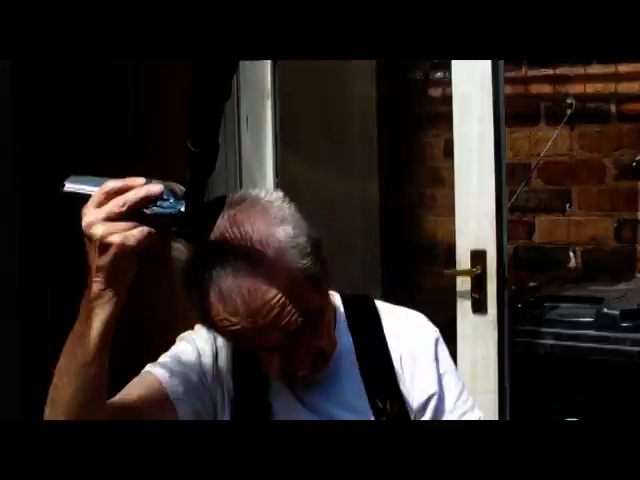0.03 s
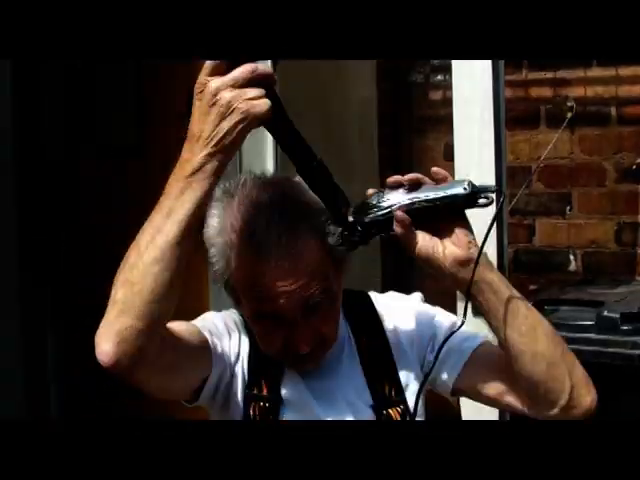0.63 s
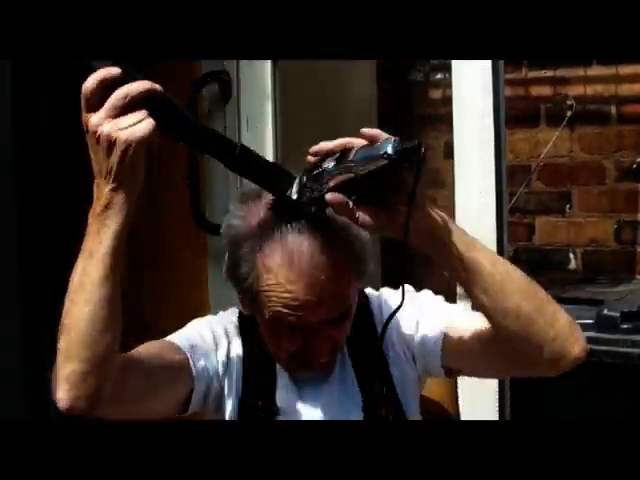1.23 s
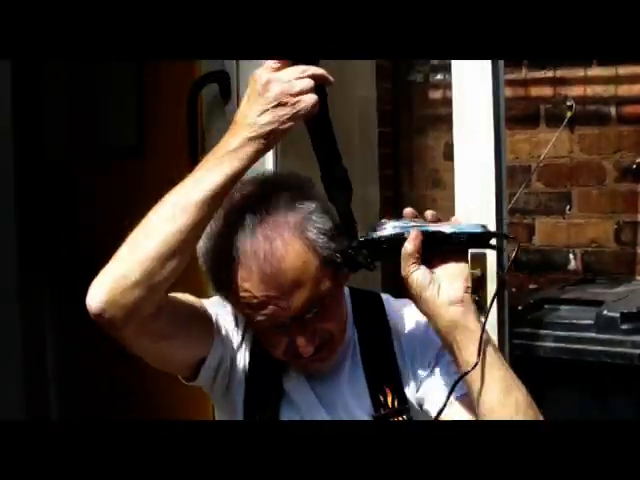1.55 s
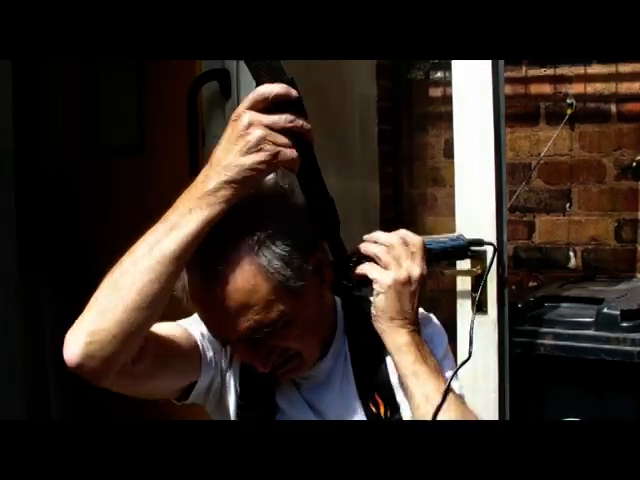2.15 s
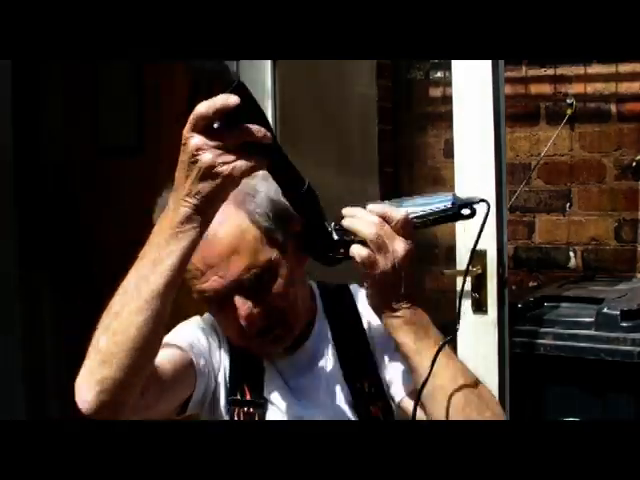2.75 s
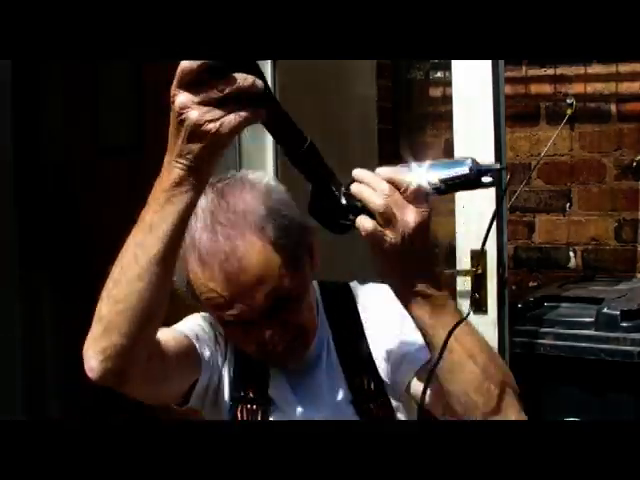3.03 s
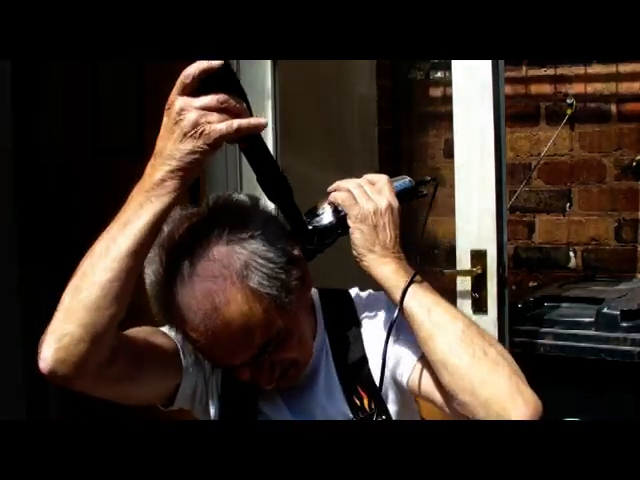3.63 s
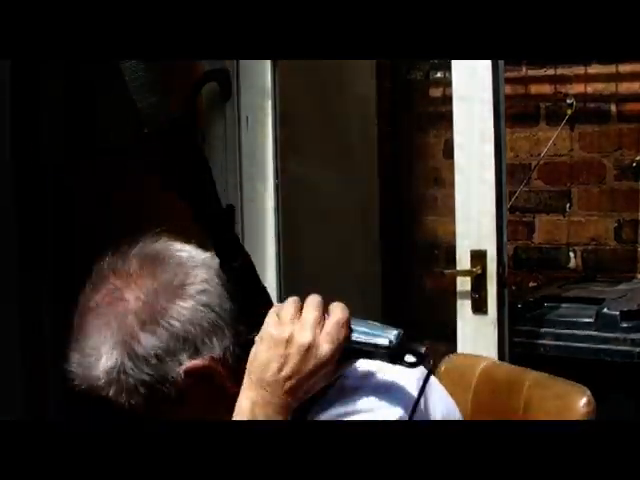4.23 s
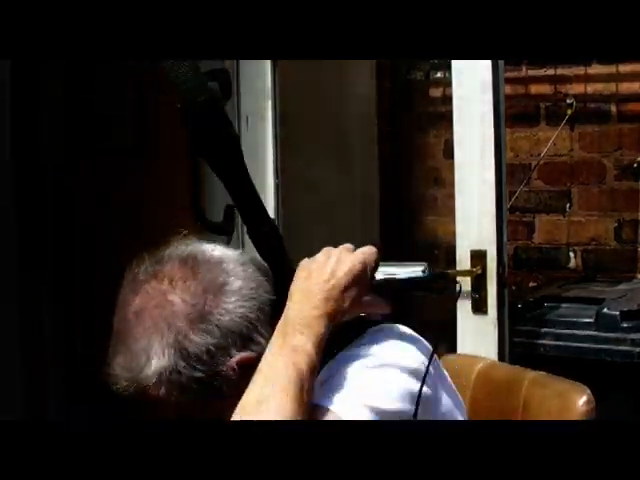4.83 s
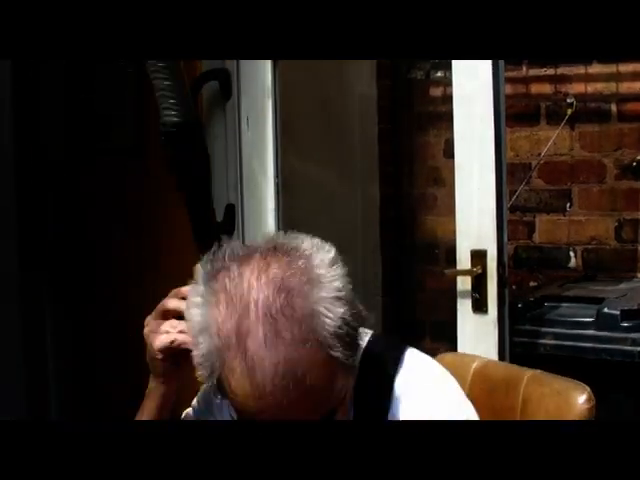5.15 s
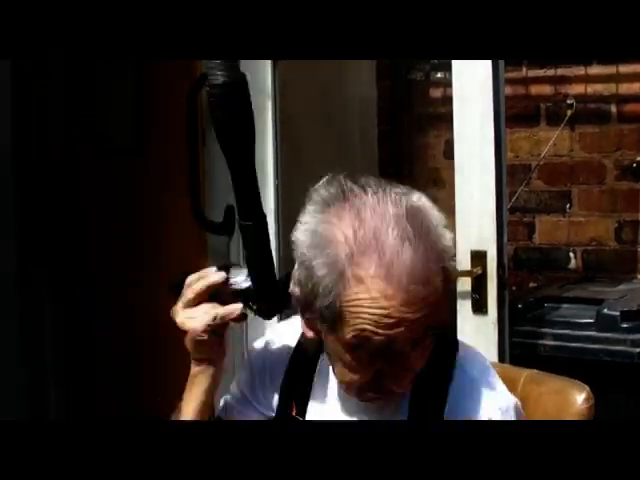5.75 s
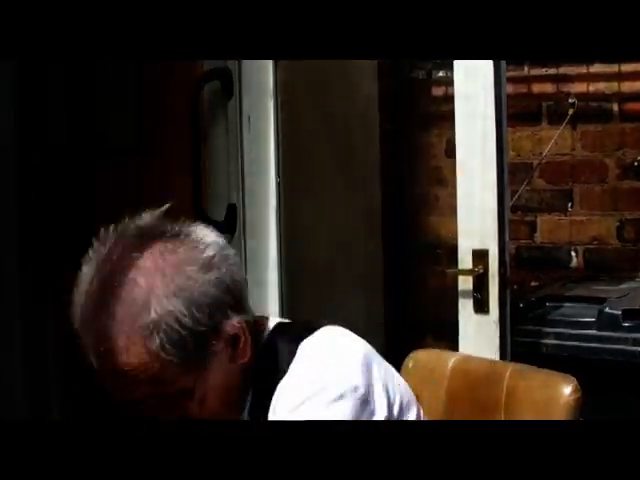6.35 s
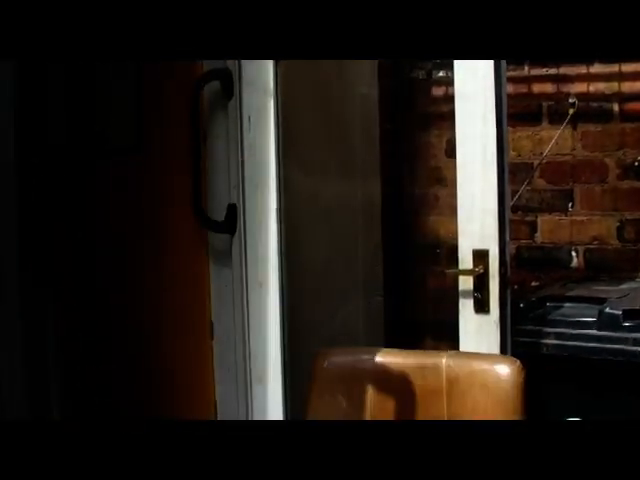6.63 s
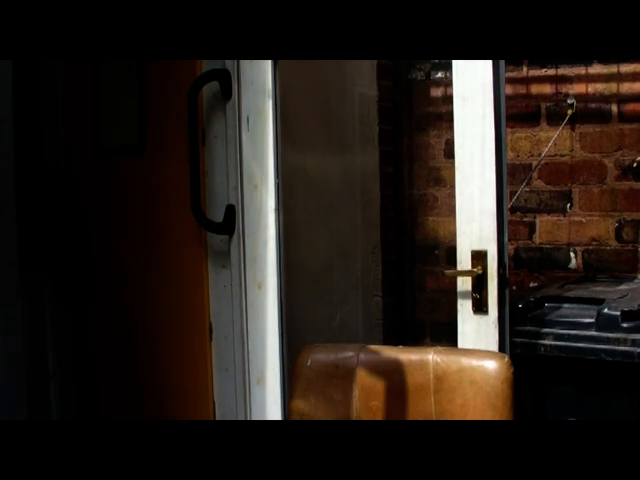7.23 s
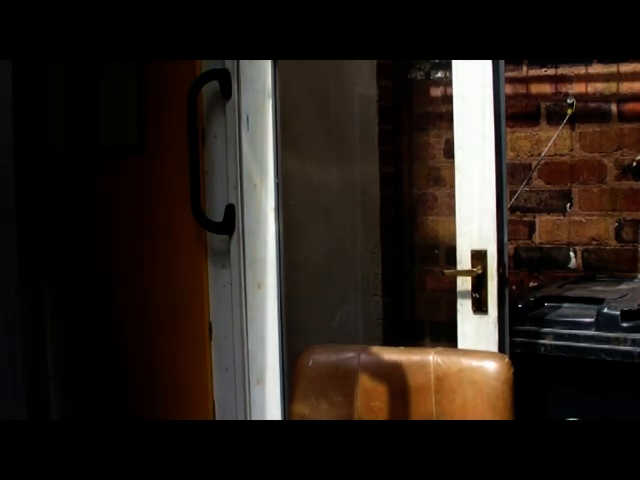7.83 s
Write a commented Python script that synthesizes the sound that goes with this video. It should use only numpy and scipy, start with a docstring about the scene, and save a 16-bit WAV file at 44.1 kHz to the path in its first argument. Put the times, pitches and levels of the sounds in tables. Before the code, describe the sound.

Vacuum suction hisses and whistles shrilly through hair clippers before snapping to a strong steady drone and a lower roar.

```python
"""A piercing, stuttering whistle over a hiss of air: a vacuum hose held to hair clippers in a yard.
The air blows an edge tone, hisses through the comb and rings in the nozzle, shifting in colour as the
nozzle moves over the scalp. Behind it lie a broad rush, a faint motor and a few soft bumps.
Then all but the bumps gives way abruptly to a strong drone, a lower roar in the hose and thin exhaust."""
import sys
import numpy as np
from scipy import signal
from scipy.io import wavfile
from scipy.ndimage import uniform_filter1d

SR = 44100
rng = np.random.default_rng(int(sys.argv[2]) if len(sys.argv) > 2 else 0)


def inscribe(sig):
    """Save sig as 16-bit PCM at rate SR to the path in sys.argv[1].

    A 1-D sig is mono; a 2-D sig holds one channel per row.
    Samples are clipped to [-1, 1] before scaling.
    """
    pcm = np.round(np.clip(np.atleast_2d(sig).T, -1, 1) * 32767)
    wavfile.write(sys.argv[1], SR, pcm.astype(np.int16))


N = 352800
TIME = np.arange(N) / SR
FRAME = 2048   # samples per frame of the noise filters
BIN_HZ = np.maximum(np.arange(FRAME // 2 + 1) * SR / FRAME, 1)[:, None]
FRAME_S = np.arange(N // (FRAME // 2) + 2) * (FRAME // 2) / SR


# pitch and level envelope of the whistle: (time [s], pitch [Hz], relative level [dB])
WHISTLE_ENVELOPE = [(0.0, 6057, -25), (0.43, 6055, -23), (3.16, 6065, -22.5), (3.7, 6069, -22),
                    (4.17, 6052, -21.5), (5.1, 6059, -20.5), (5.25, 6059, -20.5), (6.45, 6067, -22.5)]

def whistle(start_s=.0326, period_s=.10437, break_s=.0025, edge_s=.0003):
    """A pure edge tone that stutters: about ten times a second it slips half a cycle, twice in a row."""
    hz, level_db = in_time(WHISTLE_ENVELOPE, TIME)
    beat = (TIME - start_s) / period_s
    nearest = np.round(beat).astype(int)
    since_s = (beat - nearest) * period_s
    length, first, second = rng.standard_normal((nearest.max() + 1, 3))[nearest].T
    half_s = break_s / 2 * np.exp(.2 * length)
    # a slip forward chirps above the tone, a slip back below it
    slip = np.sign(first) * (1 + np.tanh((since_s + half_s) / edge_s)) / 2
    slip += np.sign(first + second) * (1 + np.tanh((since_s - half_s) / edge_s)) / 2
    level = from_db(level_db + 1.2 + .29 * drift(span_s=.031))
    return level * tone(np.cumsum(hz) / SR + slip / 2, lead=.15)


# each comb stroke opens a hissing gap: (start [s], length [s], level [dB], band centre [Hz])
COMB_STROKES = [(0.0, 0.2, -27, 12300), (0.38, 0.24, -26, 13200), (0.54, 0.32, -33.5, 10600),
                (0.91, 0.14, -25.5, 11600), (1.07, 0.22, -27.5, 10100), (1.38, 0.46, -27.3, 12000),
                (1.92, 0.65, -29, 13200), (2.5, 0.27, -26.5, 10700), (2.79, 0.25, -27, 10800),
                (3.1, 0.05, -27, 10900), (3.35, 0.35, -26.4, 16000), (3.69, 0.25, -29, 11000),
                (4.19, 0.098, -27, 8500), (4.36, 0.06, -25, 14900), (4.532, 0.08, -27.4, 8800),
                (4.69, 0.067, -26, 10900), (4.99, 0.07, -31, 10900), (5.25, 0.087, -29, 11200),
                (5.682, 0.47, -26.5, 13500), (6.16, 0.35, -33, 11200)]

def stroke_power(half_width_hz=2060):
    """Power of the flat-topped hiss bands that the comb strokes open."""
    power = 0
    for s, length_s, db, hz in COMB_STROKES:
        band = unit_power(1 / (1 + ((BIN_HZ - hz) / half_width_hz) ** 6))
        power += (band * from_db(db)) ** 2 * gate(s, length_s, edge_s=.014)
    return power


# EQ curves of the comb's dull, middle and bright hiss: (frequency [Hz], gain [dB])
DULL_EQ = [(4200, 12), (4900, -15), (5500, 9.5), (6400, -2), (7000, 11), (8300, 11), (9300, 6)]
MID_EQ = [(7900, -22), (8900, 2), (10500, 3), (11800, 4.5), (13000, -14)]
BRIGHT_EQ = [(11300, -11), (12400, 5.5), (14000, 4), (15600, 7)]
# level envelope of the dull hiss: (time [s], relative level [dB])
DULL_ENVELOPE = [(0.0, -34), (2.53, -35.5), (3.25, -33), (3.5, -34.5), (4.11, -34), (4.2, -29), (4.49, -33),
                 (4.58, -31), (4.71, -39), (4.81, -29), (4.89, -32), (6.45, -34)]

def comb_hiss(nozzle_rest_hz=3910):
    """Hiss at the comb; hair and scalp keep changing the gaps, so peaks and hollows wander through it."""
    # the dull band follows the nozzle's ring in level and pitch
    strength_db, centre_hz = nozzle_state()
    dull_db = in_time(DULL_ENVELOPE, FRAME_S)[0] + 1.5 + .52 * strength_db
    dull = eq_curve(DULL_EQ, stretch=centre_hz / nozzle_rest_hz) * from_db(dull_db)
    mid = eq_curve(MID_EQ) * from_db(-29.7)
    bright = eq_curve(BRIGHT_EQ) * from_db(-28.5)
    power = dull ** 2 + mid ** 2 + bright ** 2 + stroke_power()
    gaps = flutter(depth_db=.8, width_hz=3500, life_s=.09)
    gaps *= flutter(depth_db=1.3, width_hz=450, life_s=.25)
    gaps *= flutter(depth_db=2.8, width_hz=110, life_s=.07)
    return air(np.sqrt(power) * gaps, side_db=-16) * from_db([[-.2], [.2]])


# the nozzle moves over the scalp: (time [s], relative ring strength [dB], ring centre [Hz])
NOZZLE_MOVES = [(0.0, 0, 4000), (0.24, -5.5, 3780), (0.45, -4, 3980), (0.91, 0, 3990), (1.21, -4, 4050),
                (2.0, -3.5, 3940), (2.46, -3, 4040), (2.54, -1.5, 4020), (2.99, -0.5, 3970),
                (3.55, -5, 4000), (3.72, 0, 4150), (3.8, -2.5, 3710), (4.4, -2.5, 3900), (4.48, 1, 3950),
                (5.39, -0.8, 3916), (5.5, -3, 4040), (6.48, -3.5, 3700)]
# its mouth catches the air and the ring flares: (start [s], length [s], added strength [dB])
NOZZLE_FLARES = [(0.274, 0.091, 5), (1.226, 0.074, 4.5), (4.105, 0.04, 5.5), (4.527, 0.04, 3.5),
                 (4.703, 0.11, 2.5), (5.275, 0.13, 2.5), (5.957, 0.035, 2.5)]

def nozzle_state():
    """Control curves of the moving nozzle: ring strength (dB), flares included, and centre (Hz)."""
    strength_db, centre_hz = in_time(NOZZLE_MOVES, FRAME_S)
    flare_db = sum(db * gate(s, length_s, edge_s=.013) for s, length_s, db in NOZZLE_FLARES)
    return strength_db + flare_db, centre_hz


# air modes of the nozzle: (multiple of the ring centre, nominal width [Hz], gain [dB])
RING_MODES = [(0.914, 222, -6.5), (.985, 256, -1.5), (1.055, 263, -4), (1.37, 380, -5.5), (1.53, 387, -5.5)]

def nozzle_ring():
    """The flow excites the air modes of the nozzle, which shift together as its mouth is covered."""
    strength_db, centre_hz = nozzle_state()
    power = 0
    for multiple, width_hz, db in RING_MODES:
        detune = 1.06 * (BIN_HZ - multiple * centre_hz) / width_hz
        power += (from_db(db) / (1 + detune ** 2)) ** 2
    ring = unit_power(np.sqrt(power)) * from_db(-26 + 1.15 * strength_db)
    return air(ring * flutter(depth_db=2, width_hz=150, life_s=.07), side_db=-33)


# brief wobbles of the drone: (time [s], length [s], phase gained [cycles], level dip [0-1])
DRONE_WAVERS = [(6.994, 0.024, 1, 0.25), (7.352, .036, 0.82, 0), (7.517, .006, 0.61, 0.2)]

def drone(pitch_hz=632, level_db=-20):
    """A strong, pure tone that wavers a few times."""
    cycles, level = pitch_hz * TIME, from_db(level_db)
    for s, length_s, gained, dip in DRONE_WAVERS:
        cycles += gained * ramp(TIME - s, length_s)
        level *= 1 - dip * bell(TIME - s, length_s / 2)
    return level * tone(cycles, lead=.16)


# EQ curve of the roar: (frequency [Hz], gain [dB])
ROAR_EQ = [(30, -34), (80, -27), (115, -12), (170, -9.5), (210, -13.5), (300, -12), (380, -14), (490, -0.5),
           (570, -6), (790, -3.5), (1000, -0.5), (1300, 0), (1850, -0.5), (2100, -2.5), (2500, -0.5),
           (3000, -7), (3800, -26)]
# hollow resonances of hose and housing: (frequency [Hz], width [Hz], boost [dB])
HOSE_MODES = [(633, 40, 9), (1027, 35, 5), (1200, 70, 4.5), (1518, 35, 5), (1670, 70, 4), (1880, 50, 3.5),
              (2390, 50, 3)]

def hose_roar(level_db=-20):
    """Air rumbling through the hose, boosted at its hollow resonances."""
    boost_db = sum(db / (1 + (2 * (BIN_HZ - hz) / width_hz) ** 2) for hz, width_hz, db in HOSE_MODES)
    hollow = unit_power(eq_curve(ROAR_EQ) * from_db(boost_db))
    return air(hollow * from_db(level_db) * flutter(depth_db=2.5, width_hz=45, life_s=.2), side_db=-17)


# EQ curve of the exhaust air: (frequency [Hz], gain [dB])
EXHAUST_EQ = [(2500, -1.5), (3200, -2), (4500, -4.5), (6000, -1.5), (6600, -4), (7050, 1.5), (7700, 1),
              (7950, -8), (8400, -4), (10700, -3.5), (11800, -9), (14000, -5), (15600, -10)]

def exhaust(level_db=-22):
    """Thin, wide, unsteady hiss of exhaust air, leaning to the right."""
    hiss = eq_curve(EXHAUST_EQ) * from_db(level_db) * flutter(depth_db=1.2, width_hz=360, life_s=.08)
    return air(hiss, side_db=-.7) * from_db([[-.7], [.7]])


# EQ curve of the bed of rushing air: (frequency [Hz], gain [dB])
RUSH_EQ = [(20, 0.5), (45, -1), (80, -1), (200, -1), (320, -.5), (900, -.5), (1600, 1), (2400, 0),
           (3200, 1.5), (6000, 0.5), (16000, 0.5)]
# swells in that bed: (peak time [s], half length [s], boost [dB])
AIR_SWELLS = [(1.58, 0.16, 1.5), (5.097, .07, 2.5), (5.474, 0.026, 3), (5.748, 0.041, 3), (6.37, 0.23, 3)]

def air_rush(level_db=-26.5):
    """Diffuse, nearly white air noise from all around, steady but for a few swells."""
    boost_db = sum(db * bell(FRAME_S - s, half_s) for s, half_s, db in AIR_SWELLS)
    return air(eq_curve(RUSH_EQ) * from_db(level_db + boost_db), side_db=-1.8)


def hose_note(centre_hz=386, half_width_hz=30.77, level_db=-30.5):
    """The lowest resonance of the hose rings as a breathy note under the drone."""
    ring = unit_power(1 / (1 + ((BIN_HZ - centre_hz) / half_width_hz) ** 2))
    return air(ring * from_db(level_db), side_db=-18)


# soft low bumps: (peak time [s], half length [s], level [dB])
LOW_BUMPS = [(1.6, .08, -45), (5.126, 0.016, -32), (6.327, 0.063, -43), (6.464, 0.057, -44),
             (6.99, 0.0027, -27.5)]

def bumps(top_hz=450):
    """Short swells of dull, low noise."""
    swell = sum(from_db(db) * bell(TIME - s, half_s) for s, half_s, db in LOW_BUMPS)
    return swell * air(unit_power(1 / (1 + (BIN_HZ / top_hz) ** 2)), side_db=-2)


# faint motor whine under the hiss: (multiple of the turning rate, level [dB])
MOTOR_HARMONICS = [(5, -53), (6, -56), (9, -58), (12, -59), (15, -54), (18, -58), (20, -48), (21, -48)]

def motor(rate_hz=191.6):
    """The distant motor sings on a few multiples of its slightly unsteady turning rate."""
    turns = np.cumsum(rate_hz * (1 + .000478 * drift(span_s=.239))) / SR
    return sum(from_db(db) * tone(multiple * turns, lead=.1) for multiple, db in MOTOR_HARMONICS)


def air(gain, side_db):
    """Stereo turbulence: mid and side noise through a filter that may change in time."""
    white = signal.stft(rng.standard_normal((2, N)), nperseg=FRAME)[2]
    mid, side = signal.istft(white * gain, nperseg=FRAME)[1][:, :N]
    return mid + from_db(side_db) * side * [[1], [-1]]


def tone(cycles, lead):
    """A stereo sine whose left side is ahead by lead radians."""
    return np.sqrt(2) * np.sin(2 * np.pi * cycles + np.array([[lead], [0]]))


def eq_curve(points, stretch=1):
    """A filter through the EQ points, frequencies times stretch, rolling off steeply outside them."""
    hz, db = np.transpose(points)
    at_hz = BIN_HZ / stretch
    octaves_outside = np.abs(np.log2(at_hz / np.clip(at_hz, hz[0], hz[-1])))
    return unit_power(from_db(np.interp(np.log(at_hz), np.log(hz), db) - 104 * octaves_outside))


def flutter(depth_db, width_hz, life_s):
    """Peaks and hollows in the spectrum that come and go at random."""
    field = rng.standard_normal((len(BIN_HZ), len(FRAME_S)))
    for axis, span in enumerate((width_hz * FRAME / SR, life_s / FRAME_S[1])):
        for _ in range(2):
            field = uniform_filter1d(field, max(1, round(span)), axis=axis)
    return rms_one(from_db(depth_db * rms_one(field)))


def drift(span_s):
    """Smooth random modulation at rms 1."""
    span = max(1, round(span_s * SR))
    return rms_one(uniform_filter1d(uniform_filter1d(rng.standard_normal(N), span), span))


def gate(s, length_s, edge_s):
    """Attack, hold and release, from 0 to 1, per frame."""
    return ramp(FRAME_S - s, edge_s) * ramp(s + length_s - FRAME_S, edge_s)


def ramp(since_s, length_s):
    """A linear fade from 0 to 1, centred on time zero."""
    return np.clip(since_s / length_s + .5, 0, 1)


def bell(since_s, half_s):
    """A bell-shaped swell that peaks at time zero."""
    return np.exp(-(since_s / half_s) ** 2)


def in_time(rows, when):
    """The columns of an envelope at the given times."""
    s, *columns = np.transpose(rows)
    return [np.interp(when, s, column) for column in columns]


def unit_power(gain):
    """Scale a filter so that white noise keeps its power."""
    return gain / np.sqrt(np.mean(gain ** 2, axis=0))


def rms_one(x):
    """Scale to rms 1."""
    return x / np.sqrt(np.mean(x ** 2) + 1e-20)


def from_db(db):
    """Decibels to gain."""
    return 10 ** (np.asarray(db) / 20)


def scene(switch_s=6.509, crossfade_s=.0051):
    """The whistling hiss snaps over to the droning roar; soft bumps fall under both."""
    hissing = air_rush() + comb_hiss() + nozzle_ring() + whistle() + motor()
    droning = hose_roar() + hose_note() + exhaust() + drone()
    fade = ramp(TIME - switch_s, crossfade_s)
    return (1 - fade) * hissing + fade * droning + bumps()


def record(dry):
    """A subsonic low cut and a steep high cut on the mix."""
    low_cut = signal.butter(2, 10, "high", fs=SR, output="sos")
    high_cut = signal.ellip(16, .1, 70, 15750, fs=SR, output="sos")
    return signal.sosfilt(high_cut, signal.sosfilt(low_cut, dry))


dry = scene()
out = record(dry)
inscribe(out)
```